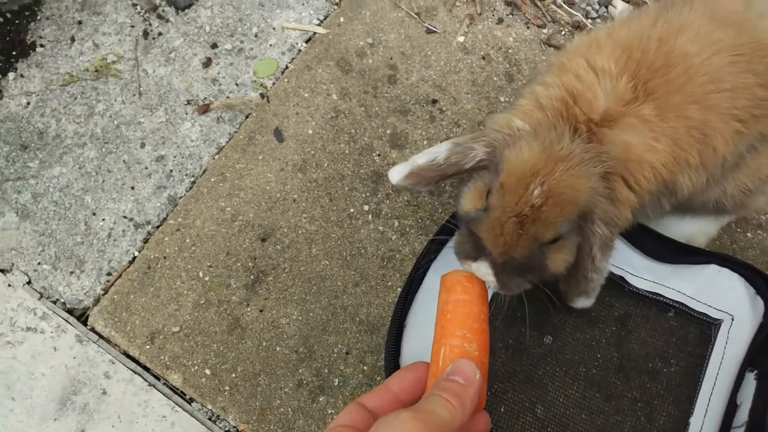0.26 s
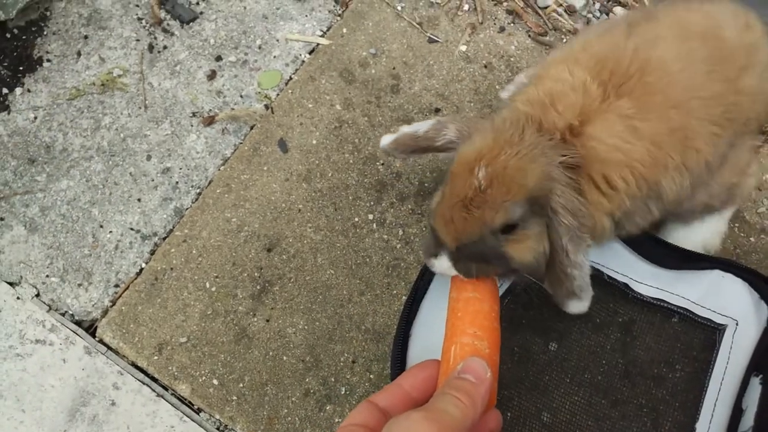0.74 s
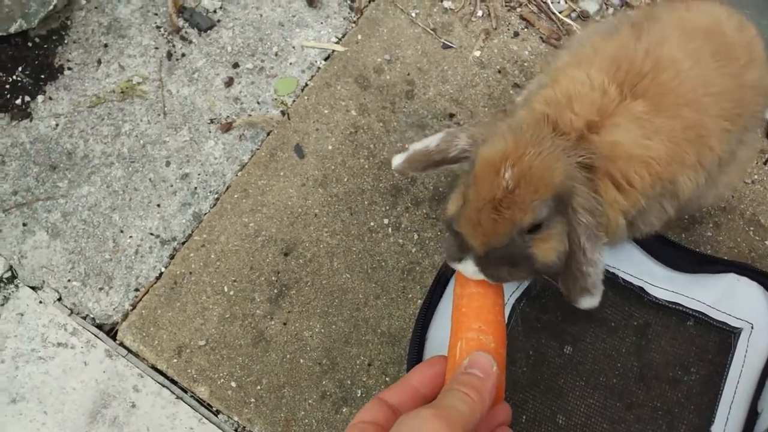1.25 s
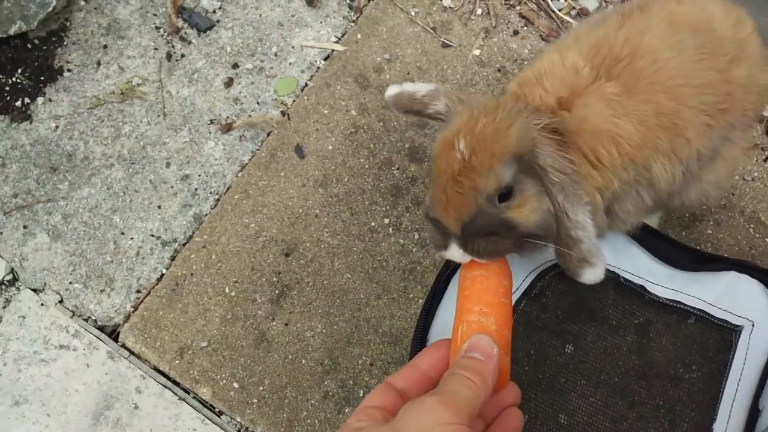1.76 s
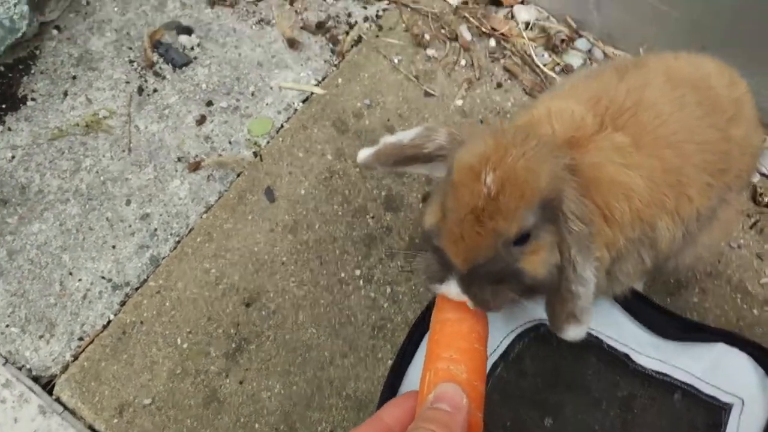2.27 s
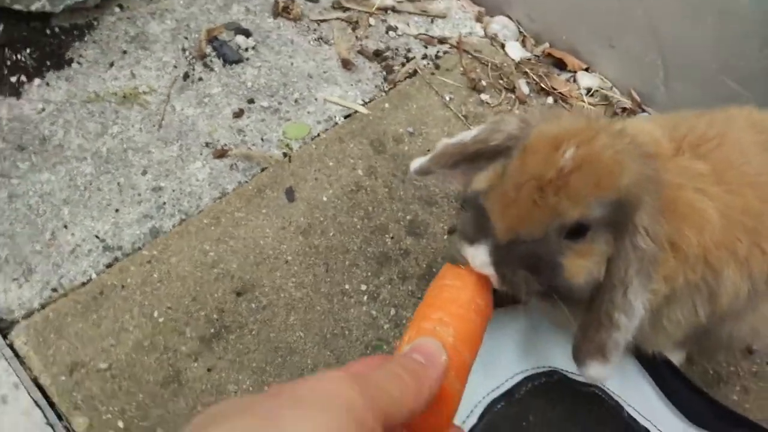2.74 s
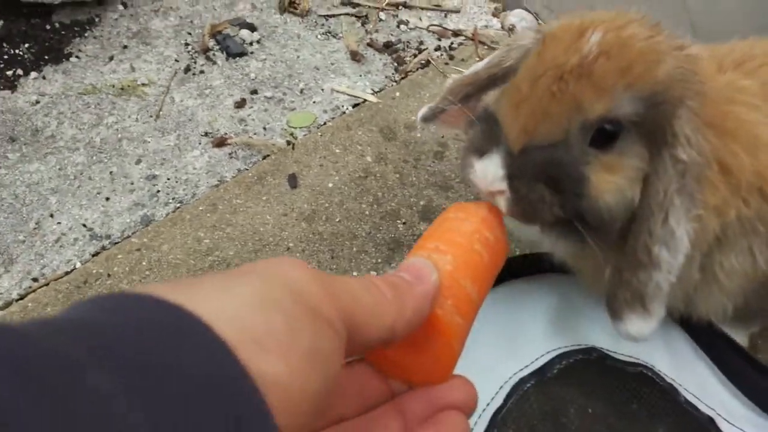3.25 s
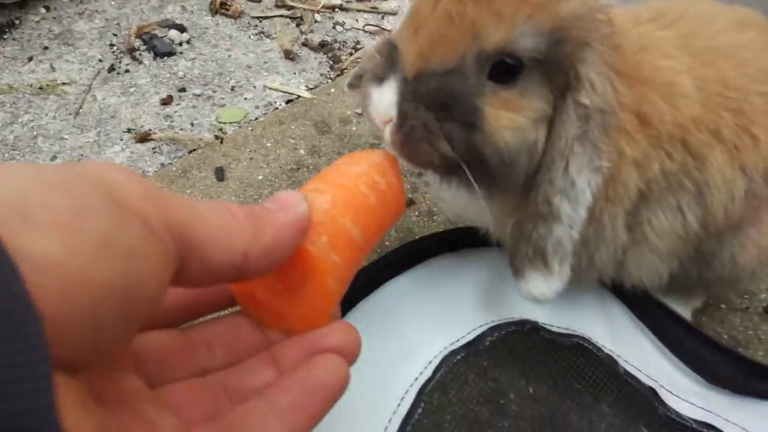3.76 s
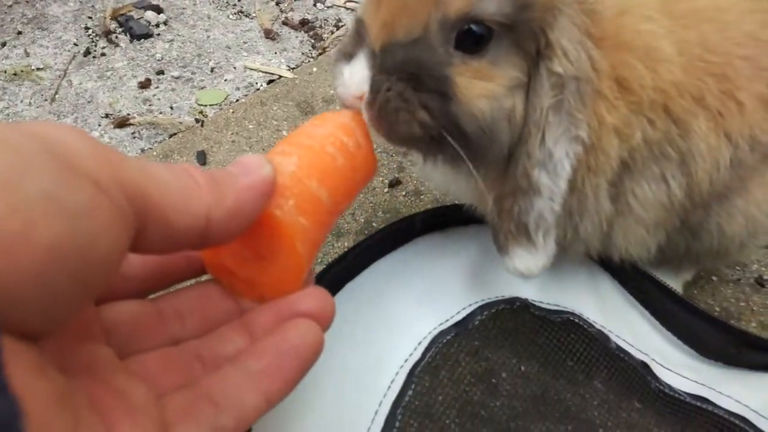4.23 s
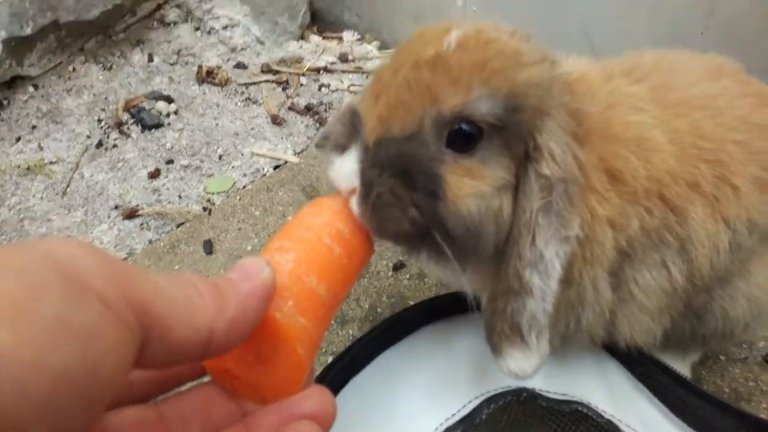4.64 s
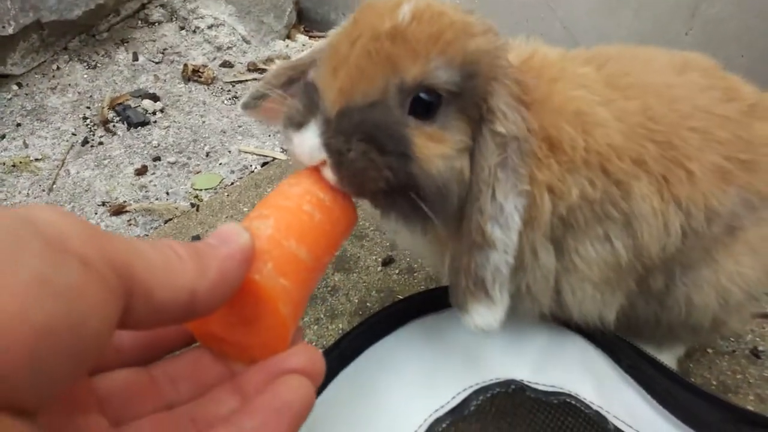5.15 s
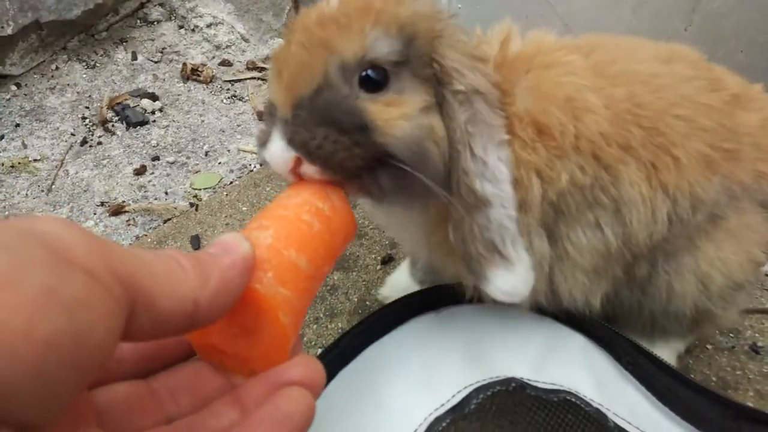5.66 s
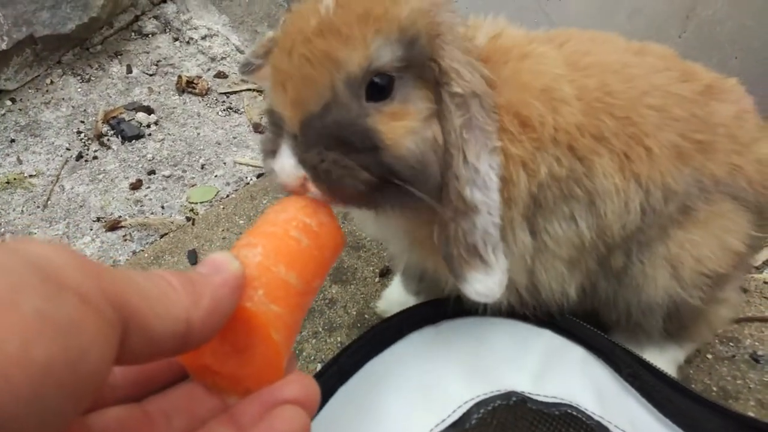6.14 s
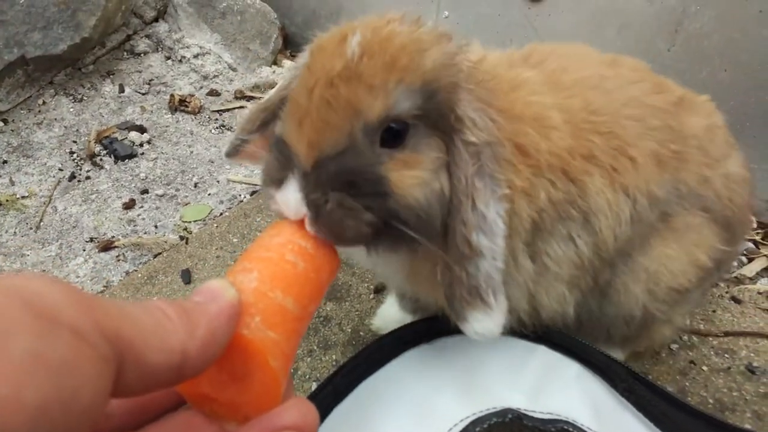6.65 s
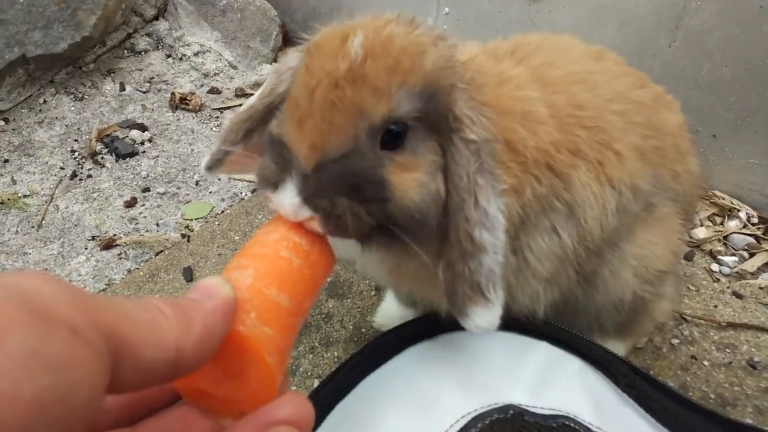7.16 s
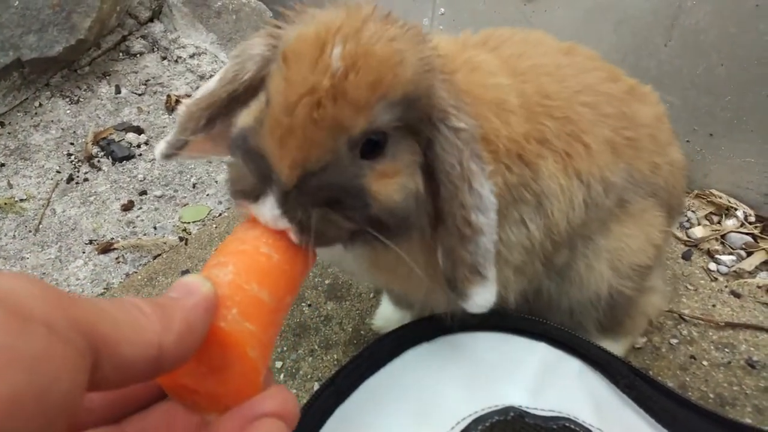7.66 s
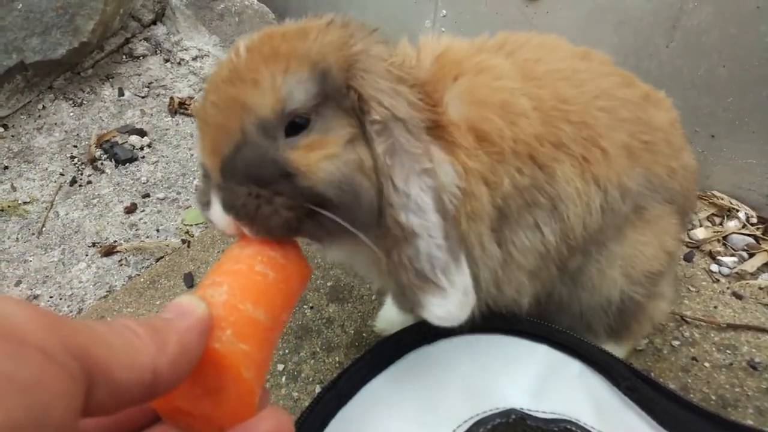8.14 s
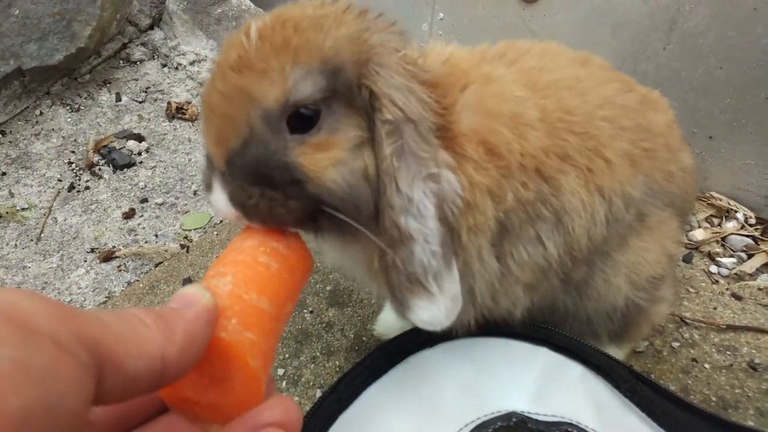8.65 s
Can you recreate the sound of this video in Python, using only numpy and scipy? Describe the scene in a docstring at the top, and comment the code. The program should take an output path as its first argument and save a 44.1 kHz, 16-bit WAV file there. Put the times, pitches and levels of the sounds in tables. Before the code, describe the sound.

A rabbit gnaws a raw carrot with small rasps and crisp snaps, while a finger rubs and bumps the microphone.

```python
"""A rabbit gnawing a carrot

On a quiet patio, close to a hand-held camera, a small rabbit rasps through a raw carrot with its front
teeth about three times a second, and pieces break off with crisp snaps. The holder shifts grip: a sleeve
swishes, a finger drags over the left microphone, then rests beside it and bumps it now and then."""
import sys
import numpy as np
from scipy import signal
from scipy.fft import rfft, irfft
from scipy.io import wavfile
from scipy.ndimage import uniform_filter1d

SR = 44100
rng = np.random.default_rng(int(sys.argv[2]) if len(sys.argv) > 2 else 0)


def pcm_store(signal):
    """Save signal as 16-bit PCM."""
    levels = np.round(np.clip(np.atleast_2d(signal), -1, 1) * 32767)
    wavfile.write(sys.argv[1], SR, levels.astype(np.int16).T)


N = 392490
TIME = np.arange(N) / SR


def amp(db):
    """Turns decibels into a number to multiply by."""
    return 10 ** (np.asarray(db) / 20)


def unit(x):
    """Scales a signal to an average strength (rms) of 1."""
    return x / np.sqrt(np.mean(x ** 2) + 1e-20)


def value_at(points, hz):
    """Reads between rows of (frequency, value), spacing the octaves evenly."""
    known_hz, value = np.transpose(points)
    return np.interp(np.log(hz + 1), np.log(known_hz + 1), value)


def level_curve(rows):
    """Loudness that follows rows of (seconds, dB) and is silent outside them."""
    seconds, db = np.transpose(rows)
    return amp(np.interp(TIME, seconds, db, left=-140, right=-140))


def pan(x, side_db):
    """Shares a sound between two channels, the left louder by side_db."""
    gains = amp(np.array([[1], [-1]]) * side_db / 2)
    return x * gains / gains.mean(0)


def add(mix, start_s, sound):
    """Mixes a sound in at the given time."""
    part = mix[round(start_s * SR):][:len(sound)]
    part += sound[:len(part)]


def impulse(tone, treble_db=0, corner_hz=3000, size=4096):
    """A click of energy 1 with the given tone, its treble turned up or down above corner_hz."""
    hz = np.fft.rfftfreq(size, 1 / SR)
    shelf_db = treble_db * hz ** 2 / (hz ** 2 + corner_hz ** 2)
    log_gain = np.log(amp(value_at(tone, hz) + shelf_db))
    mirrored = np.concatenate([log_gain, log_gain[-2:0:-1]])
    spectrum = np.exp(np.conj(signal.hilbert(mirrored)))  # packs the energy at the start
    click = np.fft.ifft(spectrum).real[:size // 2]
    return click / np.linalg.norm(click)


def colour(x, tone):
    """Filters a sound to give it a tone, listed as rows of (Hz, dB)."""
    return signal.oaconvolve(x, impulse(tone))[:len(x)]


def ring(x, modes):
    """The ringing that a small hollow adds to a sound."""
    return sum(amp(db) * signal.lfilter(*signal.iirpeak(hz, hz / width, fs=SR), x)
               for hz, width, db in modes)


def crackle(per_s, spread_db, smooth):
    """Tiny random ticks of uneven size, over a share of smooth hiss."""
    sizes = amp(spread_db * np.minimum(rng.exponential(1, N), 4)) * rng.choice([-1, 1], N)
    ticks = unit(sizes * (rng.random(N) < per_s / SR))
    return unit(ticks + smooth * rng.standard_normal(N))


def clumps(depth_db, size):
    """Random loudness that bunches ticks into clumps about size samples long."""
    wander = unit(uniform_filter1d(rng.standard_normal(N), size=size))
    return unit(amp(depth_db * wander))


def swells(rows, fade_db=0):
    """Loudness of strokes that each build up and let go, sloping down by fade_db on the way."""
    envelope = np.zeros(N)
    for start, length, db, *_ in rows:
        along = np.linspace(-.5, .5, int(length * SR))
        add(envelope, start, amp(db - fade_db * along) * signal.windows.tukey(len(along), .8))
    return envelope


def scrape(decay_s, response, size=1000):
    """A puff of noise that dies quickly and takes its tone from response."""
    t = np.arange(size) / SR
    envelope = (1 - np.exp(-t / .0004)) ** 2 * np.exp(-t / decay_s)
    return signal.fftconvolve(rng.standard_normal(size) * envelope / envelope.max(), response) / 2


def stick_slip(per_s, jitter, count=4000):
    """Skin catching and slipping: a train of ticks, uneven in spacing and size."""
    gaps, sizes = np.exp(jitter * rng.standard_normal((count, 2))).T
    at = (np.cumsum(gaps) / per_s * SR).astype(int)
    return unit(np.bincount(at[at < N], sizes[at < N], N))


# Tone of the outdoor hum and hiss. Each row: frequency in Hz, level in dB.
AIR_TONE = [(25, -38), (80, -34), (120, -17), (175, -2), (240, 1), (430, -1.5), (700, -8), (880, -8.5),
            (1050, -14), (1900, -17), (3000, -22), (6500, -24), (10000, -26), (15500, -25)]
# How alike the two sides are. Each row: frequency in Hz, likeness from 0 to 1.
AIR_LIKENESS = [(60, 0.9), (290, 0.9), (640, 0.53), (1400, 0.1), (15000, 0)]

def outdoor_air(air_db=-64.5, waver_db=-0.4):
    """A far, gently wavering hum with faint hiss, alike on both sides in the bass."""
    likeness = value_at(AIR_LIKENESS, np.fft.rfftfreq(N, 1 / SR))
    left, other = rfft(rng.standard_normal((2, N)))
    right = likeness * left + np.sqrt(1 - likeness ** 2) * other
    waver = unit(sum(np.sin(2 * np.pi * (hz * TIME + rng.random())) for hz in np.geomspace(.3, 9, 12)))
    hum = np.array([colour(side, AIR_TONE) for side in irfft([left, right], N)])
    return amp(air_db + waver_db * waver) * hum


# How the hollow of the hand rings, before and after the grip shifts.
# Each row: pitch in Hz, width in Hz, level in dB.
LOOSE_HAND_MODES = [(2860, 610, 3.5), (6800, 1830, 5)]
TIGHT_HAND_MODES = [(3890, 930, 11), (6900, 490, 4), (14600, 364, 1)]

def hand_hollow(pair, loose_db, tight_db):
    """The hollow between hand and left microphone colours that side, and tightens as the grip shifts."""
    left, right = pair
    shifted = np.interp(TIME, [3.0, 3.8], [0, 1])
    loose = (1 - shifted) * amp(loose_db) * ring(left, LOOSE_HAND_MODES)
    tight = shifted * amp(tight_db) * ring(left, TIGHT_HAND_MODES)
    return np.array([left + loose + tight, right])


# Strokes of the teeth through the carrot.
# Each row: start in seconds, length in seconds, level in dB, wet ring in dB against that level.
STROKES = [(0.729, 0.048, -53.5, -17), (0.951, 0.16, -67.5, -16), (1.32, 0.26, -75.5, 15.5),
           (1.67, 0.29, -69.5, 9), (1.955, 0.25, -72, 20), (2.41, 0.29, -72, -14), (4.755, 0.11, -71.5, 17),
           (4.918, 0.22, -69.5, 18), (5.165, 0.13, -66.5, 7), (5.41, 0.093, -81, 21),
           (5.562, 0.093, -68, 16.5), (5.729, 0.12, -64, 13.5), (6.003, 0.13, -71, 18),
           (6.216, .15, -71, 11), (6.636, 0.14, -75, 9), (6.827, 0.13, -63.5, -14), (7.043, 0.11, -73.5, 6),
           (7.262, 0.13, -67, 20), (7.482, 0.06, -69.5, 17), (7.622, 0.085, -63.5, -3),
           (7.854, 0.086, -71, 20.5), (8.059, 0.13, -68, 19.5), (8.372, 0.14, -67, 15.5),
           (8.686, 0.12, -70.5, -13)]
# Tones of the rasp and of crisp ticks and snaps. Each row: frequency in Hz, level in dB.
RASP_TONE = [(200, -35), (700, -13.5), (1400, 2), (2400, -5), (3500, -6), (6000, -4.5), (10000, -0.5),
             (13000, -2.5), (15300, -1)]
CRISP_TONE = [(200, -22), (600, -1), (1400, 1), (2600, -4), (3900, 0.5), (5200, -0.5), (7500, 5),
              (10000, 2), (11700, 12.5), (13500, 10), (14600, 14), (16000, 17.5)]
# The hollow ring heard with each wet bite, partly from the hand cupped by the microphone.
# Each row: pitch in Hz, width in Hz, level in dB.
BITE_MODES = [(1290, 380, -13), (2490, 310, -5.5), (3900, 300, -10.5)]

def teeth_rasp(juice_db=-10, pitch_spread=0.05, drying_db=23):
    """Teeth burst cell after cell in small clumps; juice ticks between them and wet bites sound hollow."""
    ruptures = unit(clumps(4, size=260) * crackle(per_s=2200, spread_db=2.5, smooth=0.52))
    cells = colour(ruptures, RASP_TONE)
    juice = amp(juice_db) * colour(crackle(per_s=200, spread_db=4.5, smooth=.1), CRISP_TONE)
    grit = unit(cells * clumps(4, size=130))
    tunings = 1 + pitch_spread * rng.uniform(-1.4, 1, len(STROKES))  # a slightly new pitch each stroke
    hollow = np.zeros(N)
    for (start, length, db, wet_db), tuning in zip(STROKES, tunings):
        wet = grit * swells([(start, length, db + wet_db)], drying_db)  # strongest as the teeth go in
        bite = wet[round(start * SR):][:round(length * SR)]
        modes = [(hz * tuning, width, mode_db) for hz, width, mode_db in BITE_MODES]
        add(hollow, start, ring(bite, modes))
    return swells(STROKES) * (cells + juice) + hollow


# Pieces of carrot breaking off. Each row: time in seconds, level in dB, crispness (treble) in dB.
SNAPS = [(0.757, -34, -1), (5.026, -40, -12), (5.0568, -22, -15), (5.0616, -27.5, -6), (5.07, -30, -10),
         (5.198, -22.5, -9.5), (5.2726, -41, -19), (5.811, -26.5, -9), (5.847, -37.5, -18),
         (6.0491, -43, -35), (6.573, -41.5, -14), (6.904, -42, -14), (6.915, -38.5, -16), (7.1522, -41, 6),
         (7.2964, -40.5, -23), (7.6835, -44, -11), (7.7291, -45, 0), (8.1568, -36, -15.5),
         (8.1637, -31, -7), (8.1908, -37.5, -7)]
# Front teeth clicking through the flesh. Each row: time in seconds, level in dB, ring pitch in Hz.
TOOTH_CLICKS = [(1.4357, -44, 2600), (1.4485, -32.5, 2700), (1.7446, -45, 3130), (1.771, -42, 2680),
                (1.7836, -42, 2730), (1.809, -44, 6500), (2.0564, -44, 2750), (2.1212, -45, 990),
                (5.6156, -44, 3640), (6.756, -57, 3910), (6.857, -50, 3300), (7.0772, -50, 3700),
                (7.3495, -53, 4000), (7.547, -40, 2600), (7.6114, -34, 4400), (8.094, -49, 3900),
                (8.465, -44.5, 4000)]

def snaps_and_clicks(gain_db=-4, bright_db=2, tear_db=-12, crack_s=0.0011, ring_width_hz=800, ring_db=2):
    """Fibres tear for a few milliseconds around each break, as a piece snaps off or a tooth clicks."""
    out = np.zeros(N)
    t = np.arange(-.012, .012, 1 / SR)
    tear = np.exp(-abs(t - .002) / .0025)
    envelope = np.exp(-(t / crack_s) ** 2) + amp(tear_db) * tear
    # each snap sets off a thin, high ring in the microphone
    snaps = [(at, db, treble_db, 14200) for at, db, treble_db in SNAPS]
    clicks = [(at, db, -18, hz) for at, db, hz in TOOTH_CLICKS]  # less treble, so duller
    for at, db, treble_db, ring_hz in snaps + clicks:
        response = impulse(CRISP_TONE, treble_db=treble_db + bright_db, corner_hz=6840)
        response = response + ring(response, [(ring_hz, ring_width_hz, ring_db)])
        response /= np.linalg.norm(response)
        crack = signal.fftconvolve(rng.standard_normal(len(t)) * envelope, response) / 2
        add(out, at + t[0] + 0.0015, amp(db + gain_db) * crack)
    return out


def patio_echo(x, tail_db=-13, fade_s=0.093, size=8000):
    """Slabs and a wall scatter a short, faint echo to each side."""
    t = np.arange(size) / SR
    echoes = rng.standard_normal((2, size)) * (rng.random((2, size)) < .1)
    echoes *= amp(-60 * t / fade_s) * (t > .003)
    echoes /= np.linalg.norm(echoes, axis=1, keepdims=True)
    return amp(tail_db) * signal.oaconvolve(x[None], echoes, axes=1)[:, :N]


# The rabbit drifts left as the camera comes round. Each row: time in seconds, left minus right in dB.
RABBIT_SIDE = [(.7, 3.5), (4.8, 7.5)]

def rabbit():
    """The gnawing, heard directly and bouncing off the patio."""
    gnawing = teeth_rasp() + snaps_and_clicks()
    side_db = np.interp(TIME, *np.transpose(RABBIT_SIDE))
    return pan(gnawing, side_db) + patio_echo(gnawing)


# Tone of the sleeve's cloth. Each row: frequency in Hz, level in dB.
SLEEVE_TONE = [(150, -19), (400, 11.5), (1200, 5.5), (3000, 1.5), (4500, 1.5), (7000, 4.5), (9500, 0.5),
               (11500, -6.5), (15500, -4)]

def sleeve_swish(peak_s=3.08, stop_s=4.1, peak_db=-53, brush_db=-72, rise_db_per_s=35.5, fall_db_per_s=86):
    """Fine fibres catch and let go, swelling as the arm reaches out, then brushing on until it stops."""
    fibres = unit(clumps(2, size=700) * crackle(per_s=3400, spread_db=-0.5, smooth=0.82))
    t = TIME - peak_s
    reaching_db = peak_db + rise_db_per_s * t
    settling_db = np.maximum(peak_db - fall_db_per_s * t, brush_db)
    arm = amp(np.where(t < 0, reaching_db, settling_db)) * (TIME < stop_s)
    return pan(colour(fibres * arm, SLEEVE_TONE), side_db=25)


# Grazes of the cuff. Each row: start in seconds, length in seconds, level in dB.
CUFF_GRAZES = [(2.595, 0.15, -53.5), (2.75, 0.039, -71), (2.79, 0.13, -59.5), (2.89, 0.12, -56),
               (3.055, 0.16, -55)]
# Tone of the cuff. Each row: frequency in Hz, level in dB.
CUFF_TONE = [(500, -31.5), (3500, -17.5), (5500, -7), (9500, -4.5), (12000, -14.5), (15500, -20.5)]

def cuff_grazes():
    """The cuff grazes the left side in a few bright, grainy scrapes."""
    fibres = unit(clumps(1, size=500) * crackle(per_s=1700, spread_db=-1, smooth=0.66))
    return swells(CUFF_GRAZES) * colour(fibres, CUFF_TONE) * amp([[0], [-22]])


# Skin scuffing the left side. Each row: start in seconds, length in seconds, level in dB.
SCUFFS = [(3.06, 0.13, -42), (3.345, 0.033, -46), (3.395, .028, -50), (3.478, 0.054, -45),
          (3.645, .035, -47.5)]
# The palm sliding on the right side. Each row: time in seconds, level in dB.
PALM_SLIDE = [(2.6, -80), (2.83, -71), (2.97, -59), (3.15, -61), (3.28, -65), (3.5, -67), (3.7, -70)]
# Tone of skin on the camera body. Each row: frequency in Hz, level in dB.
GRIP_TONE = [(500, -20), (2500, 0), (5500, 6.5), (9000, -3), (12000, -2), (15500, -0.5)]

def grip_rub():
    """Dry skin scrapes unevenly over the camera body: short scuffs on the left, the palm on the right."""
    sides = []
    for loudness in (swells(SCUFFS), level_curve(PALM_SLIDE)):
        grains = clumps(1.7, size=300) * crackle(per_s=1600, spread_db=4, smooth=0.81)
        sides.append(colour(loudness * grains, GRIP_TONE))
    return np.array(sides)


# Speed of the finger sliding over the microphone. Each row: time in seconds, speed as a level in dB.
DRAG_SPEED = [(3.07, -51), (3.135, -32), (3.165, -23.5), (3.188, -23.5), (3.222, -23.5), (3.237, -23.5),
              (3.25, -19.5), (3.275, -26), (3.3, -25.5), (3.335, -41.5), (3.36, -28.5), (3.395, -44.5),
              (3.7, -44.5)]
# The finger sticks, then jerks free. Each row: time in seconds, level in dB, seconds stuck beforehand.
JERKS = [(3.311, -26.5, 0.015), (3.412, -26, 0.0041), (3.441, -23, 0.016), (3.493, -23, 0.0028),
         (3.562, -27.5, 0.012), (3.591, -29.5, 0.0075), (3.608, -30.5, 0.0022)]
# Tones of the rubbing and of the skin's dry hiss. Each row: frequency in Hz, level in dB.
DRAG_TONE = [(30, -28), (105, -45.5), (190, -6), (300, -1), (500, -1.5), (900, -4.5), (1400, -8.5),
             (2400, -15.5), (4000, -25.5), (7000, -40.5), (11000, -45), (15000, -41)]
SKIN_HISS_TONE = [(1000, -26), (4000, 11), (7000, 1.5), (10000, -7), (15000, -3)]
# How the casing rings under the finger. Each row: pitch in Hz, width in Hz, level in dB.
CASING_MODES = [(633, 46, -10.5), (1120, 440, -20.5)]
COVER_S, COVER_DB = 3.2072, -21.5  # the heavy push as the fingertip first covers the microphone hole

def finger_drag(push_decay_s=0.0079, jerk_decay_s=0.082, jerk_shrink=0.6, stuck_db=-22, hiss_db=-38):
    """Skin ridges catch and slip on the casing; each jerk starts with a jolt and dies sooner than the last."""
    slide = level_curve(DRAG_SPEED)
    push = amp(COVER_DB) * np.exp(-abs(TIME - COVER_S) / push_decay_s) * (TIME > COVER_S)
    speed = slide + push
    for k, (at, db, stuck_s) in enumerate(JERKS):
        jerk = np.exp(-abs(TIME - at) / (jerk_decay_s * jerk_shrink ** k))
        jolt = 1.3 * np.exp(-abs(TIME - at) / .005)
        speed = np.where(TIME >= at - stuck_s, slide * amp(stuck_db), speed)
        speed = np.where(TIME >= at, slide + amp(db) * (jerk + jolt), speed)
    ridges = unit(rng.standard_normal(N) + 0.46 * stick_slip(per_s=154, jitter=.1))
    rub = colour(ridges * speed, DRAG_TONE)
    grains = unit(clumps(3, size=200) * crackle(per_s=900, spread_db=2.5, smooth=.4))
    hiss = colour(grains * speed ** 0.47, SKIN_HISS_TONE)  # grows more gently with speed than the rub
    return rub + ring(rub, CASING_MODES) + amp(hiss_db) * hiss


def casing_knock(knock_db=-11.5, rise_s=0.003):
    """The casing knocks at its lowest pitch as the fingertip pushes on it."""
    out, t = np.zeros(N), np.arange(SR // 20) / SR
    envelope = t / rise_s * np.exp(1 - t / rise_s)
    add(out, COVER_S, amp(knock_db) * envelope * np.sin(2 * np.pi * CASING_MODES[0][0] * t))
    return out


# Tone of a sudden suck of air at the microphone hole. Each row: frequency in Hz, level in dB.
SUCK_TONE = [(30, -26), (115, -35), (185, -2), (260, 2), (420, 0), (620, -5.5), (850, -9.5), (1150, -16),
             (3000, -17), (10000, -36.5), (15000, -32.5)]

def air_suck(sharp_db):
    """One sudden drop in pressure at the hole; the microphone swings back in a short knock."""
    response = impulse(SUCK_TONE, treble_db=sharp_db, corner_hz=910)
    return -response / abs(response).max()


def finger_thumps(thump_db=-5):
    """Covering the hole, and each jerk after it, pulls a little air from the microphone."""
    out = np.zeros(N)
    for at, db, *_ in [(COVER_S, COVER_DB)] + JERKS:
        add(out, at + 0.0009, amp(db + thump_db) * air_suck(sharp_db=-8))
    return out


# The finger bumping the microphone. Each row: time in seconds, level in dB, sharpness (treble) in dB.
BUMPS = [(3.6394, -14.5, 6.5), (3.691, -18.5, 7.5), (3.797, -28.5, 4), (3.852, -18, 10), (4.2333, -15, 0),
         (4.4687, -14, 4), (4.4947, -17, 4), (4.5622, -16.5, 1), (4.6343, -23.5, -2), (4.6691, -22.5, -3),
         (5.21, -17.5, -1.5), (6.1223, -19.5, 1), (6.449, -19, -2), (7.603, -24.5, -1.5)]
# Skin flicking off the edge of the casing. Each row: time in seconds, level in dB.
FLICKS = [(3.577, -37), (3.628, -35), (3.675, -33.5), (3.68, -35), (3.9613, -50.5)]
# Tone of a flick. Each row: frequency in Hz, level in dB.
FLICK_TONE = [(60, -24), (250, 15), (600, -56), (1000, 0), (2700, -12), (4000, 2.5), (5500, -3), (7300, 0),
              (10000, -9), (15000, -14)]

def bumps_and_flicks(bump_db=-1, scuff_db=-8, flick_db=8, pocket_width_hz=300, pocket_db=-6):
    """A bump is a sharp suck as the skin lets go, a brief scuff and a flick; some flicks come alone."""
    out, flick = np.zeros(N), impulse(FLICK_TONE)
    # the air pocket under the fingertip rings at two new pitches every time
    pockets_hz = rng.uniform([550, 1400], [1050, 2800], (len(BUMPS), 2))
    for (at, db, sharp_db), pitches in zip(BUMPS, pockets_hz):
        suck = air_suck(sharp_db)
        scuff = scrape(0.0028, suck / np.linalg.norm(suck))[:len(suck)]
        bump = amp(db + bump_db) * (suck + amp(scuff_db) * scuff)
        add(out, at, bump + ring(bump, [(hz, pocket_width_hz, pocket_db) for hz in pitches]))
    flicks_after_bumps = [(at + 0.0018, db - 29.5) for at, db, _ in BUMPS]
    for at, db in FLICKS + flicks_after_bumps:
        add(out, at + 0.00052, amp(db + flick_db) * scrape(0.0033, flick))
    return out


# Moments when the finger creeps. Each row: start in seconds, length in seconds, level in dB.
CREEPS = [(3.66, 0.32, -55), (4.48, 0.25, -52)]
# Tone of the creeping. Each row: frequency in Hz, level in dB.
CREEP_TONE = [(100, -34.5), (200, -5), (400, -4.5), (530, 1.5), (780, -25), (1080, -11), (1600, -27),
              (4000, -27), (15000, -51)]

def finger_creep(creep_db=4):
    """The finger creeps over the casing in tiny, uneven slips."""
    slips = stick_slip(per_s=98, jitter=0.39) * swells(CREEPS)
    return amp(creep_db) * colour(slips, CREEP_TONE)


# How the nail's click rings. Each row: pitch in Hz, level in dB, seconds to fade by 60 dB.
NAIL_MODES = [(1010, -15, 0.014), (4280, 1.5, 0.004), (7000, -3, 0.0061), (8700, -3.5, .003),
              (13900, -4, .0015)]

def nail_click(start_s=3.78, nail_db=-23, low_cut_hz=900):
    """A fingernail clicks off the edge of the casing, scraping as it goes."""
    out, t = np.zeros(N), np.arange(SR // 20) / SR
    click = sum(amp(nail_db + db - 60 * t / fade_s) * np.sin(2 * np.pi * hz * t)
                for hz, db, fade_s in NAIL_MODES)
    scratch = signal.fftconvolve(click, scrape(.0015, [.12]))[:len(t)]
    low_cut = signal.butter(2, low_cut_hz, "high", fs=SR)
    add(out, start_s, signal.lfilter(*low_cut, click + scratch))
    return out


def scene():
    """Rabbit and outdoor air reach both microphones; the finger is heard almost only on the left."""
    finger = finger_drag() + finger_creep() + finger_thumps() + bumps_and_flicks()
    touch = (finger + casing_knock() + nail_click()) * amp([[0], [-41]])
    gnawing = hand_hollow(rabbit(), loose_db=-0.5, tight_db=3.5)
    air = hand_hollow(outdoor_air(), loose_db=-1.5, tight_db=-2.0)
    return gnawing + air + touch + sleeve_swish() + cuff_grazes() + grip_rub()


def record(dry):
    """The camera cuts off the treble above 16 kHz."""
    high_cut = signal.firwin(255, 16000, window=("kaiser", 9), fs=SR)
    return signal.oaconvolve(dry, high_cut[None], "same")


dry = scene()
out = record(dry)
pcm_store(out)
```